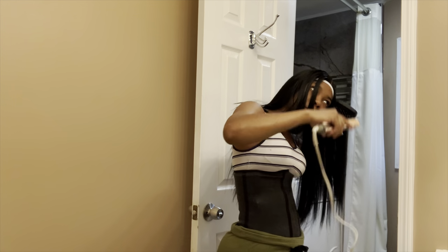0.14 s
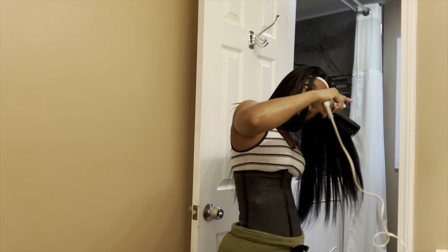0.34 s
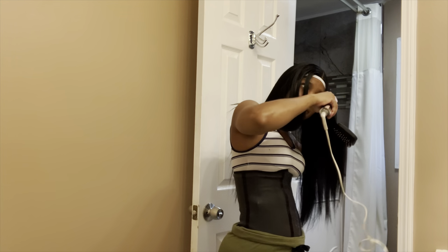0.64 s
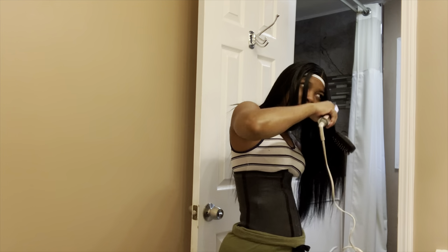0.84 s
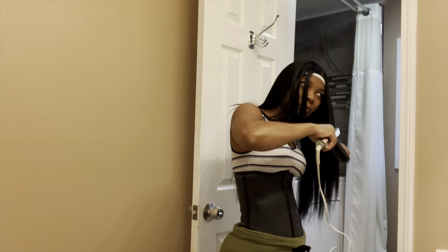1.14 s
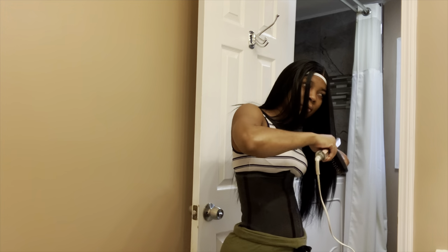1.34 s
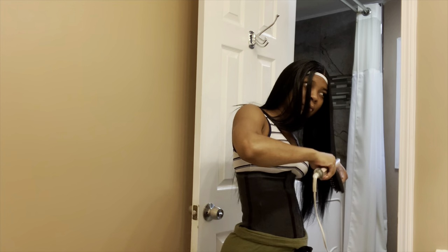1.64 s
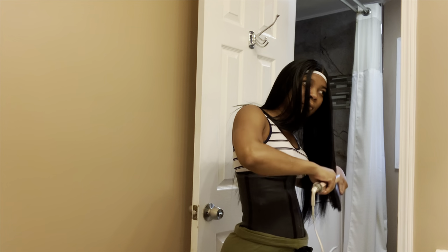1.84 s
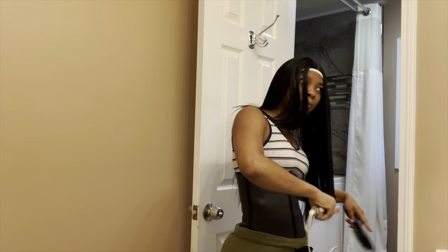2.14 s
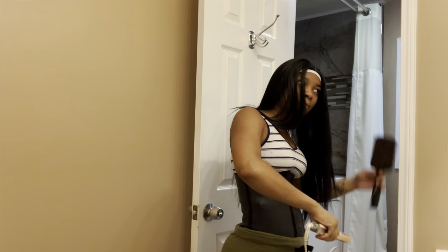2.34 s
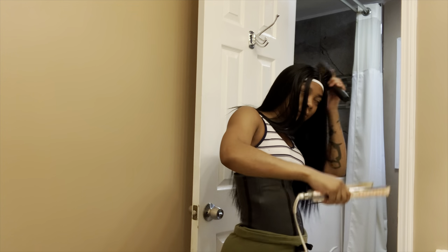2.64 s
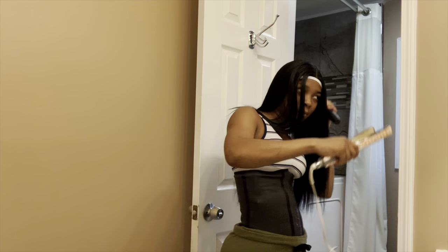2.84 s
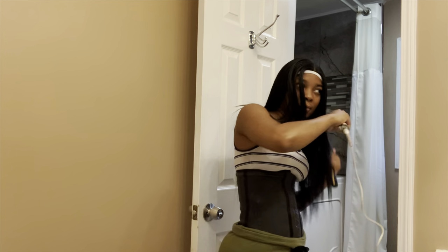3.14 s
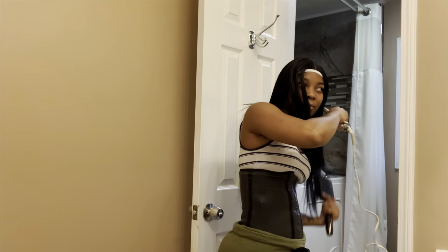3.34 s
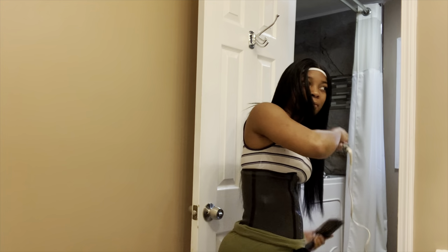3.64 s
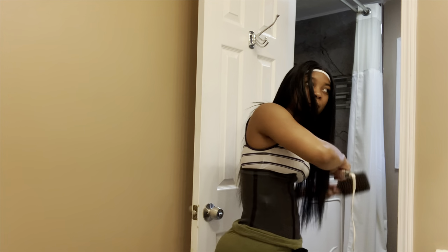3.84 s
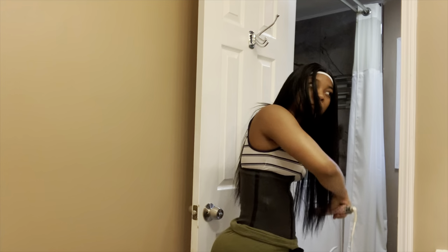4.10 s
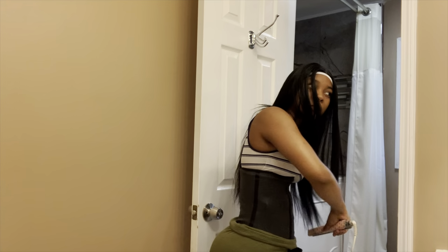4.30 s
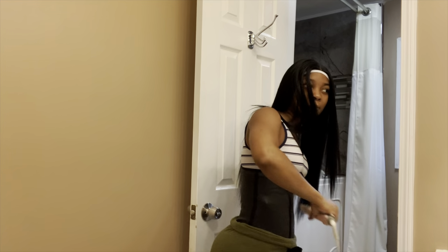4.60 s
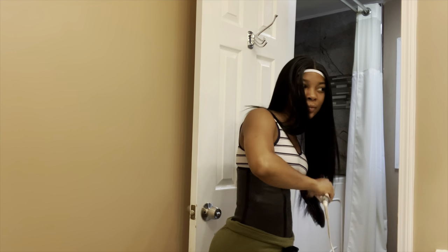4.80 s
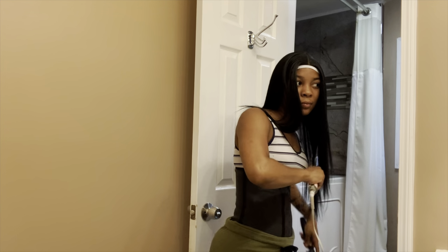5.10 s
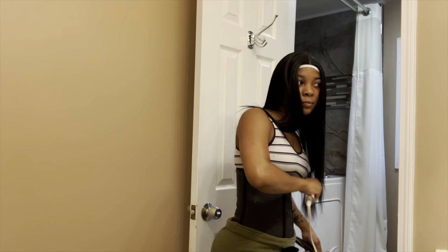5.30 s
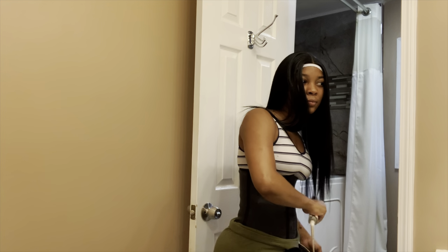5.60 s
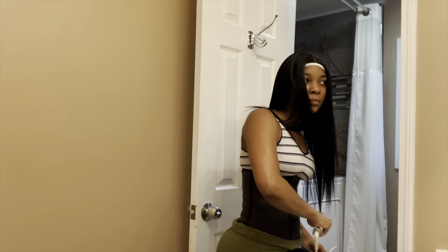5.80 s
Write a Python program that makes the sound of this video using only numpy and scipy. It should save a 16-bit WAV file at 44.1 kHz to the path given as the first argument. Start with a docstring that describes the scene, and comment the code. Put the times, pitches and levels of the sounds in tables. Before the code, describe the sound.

A brush is pulled through long synthetic hair in short scraping strokes, with plastic clacks, a flat iron clapping, footfalls and ripping tangles indoors.

```python
"""In a small, hard-walled hallway with a faint rumble, a paddle brush is drawn through long synthetic hair.
From the start, random slips of the bristles scrape, chatter and hiss, and the brush clacks in the hand.
Soon a flat iron claps and rings; then gliding fuzzy tones sing in the strands and loose ends swish.
Soft steps and dull landings of the brush follow, and a tangle rips in a burst of snaps. Later a heavy step
sets the floor ringing, something bumps the door, and a louder tangle rips before the last strokes."""
import sys
import numpy as np
from scipy import signal
from scipy.fft import rfft, irfft
from scipy.io import wavfile
from scipy.ndimage import uniform_filter1d

SR = 44100
rng = np.random.default_rng(int(sys.argv[2]) if len(sys.argv) > 2 else 0)


def bounce(signal):
    """Save signal as a 16-bit WAV file at the path given by the first command-line argument."""
    frames = np.transpose(np.atleast_2d(signal))
    limited = np.clip(frames, -1, 1)
    pcm = np.round(limited * 32767).astype(np.int16)
    wavfile.write(sys.argv[1], SR, pcm)


N = 262703

SIZE = 32768  # samples in a short sound or a filter
HZ = np.fft.rfftfreq(SIZE, 1 / SR)
T = np.arange(SIZE) / SR

# Faint rumble and hiss of the house. Each row: frequency in Hz, strength in dB per Hz.
AIR_SPECTRUM = [(20, -11), (45, 8), (80, 0), (140, -3.5), (250, -7.5), (500, -10), (1000, -20), (3000, -24),
                (8000, -29.5), (15000, -40)]
AIR_DB = -59.5

# Long passes down the hair. Each row: start in seconds, end in seconds, hiss of the strands in dB,
# its drift in dB per second, chatter at the start in dB, chatter at the end in dB, cushion drumming in dB.
PASSES = [(0.0, 0.552, -62, -22.5, -80, -109, -52.5), (0.813, 1.116, -61, -32, -56, -64, -64.5),
          (1.212, 2.243, -67.5, 2.5, -61, -56.5, -56.5), (2.667, 3.386, -65.5, 4, -48.5, -66, -50.5),
          (3.583, 4.318, -61, -1.5, -52, -46, -62), (5.192, 5.593, -58.5, -40, -46, -56, -68),
          (5.567, 5.963, -72, 25, -50.5, -46.5, -68)]
PASS_ATTACK_S, PASS_RELEASE_DB_PER_S = 0.027, 234
CUSHION_FADE_DB_PER_S = 11  # the cushion drums less as the brush leaves the head
# The brush pressed against the cap. Each row: start in seconds, length in seconds, level in dB,
# chatter of the bristles relative to it in dB.
PRESSES = [(-.02, 0.066, -41, -3), (0.128, 0.088, -49, -5), (0.512, 0.039, -51.5, -1),
           (0.826, 0.097, -52.5, -36), (1.274, 0.075, -51.5, 0), (1.6, .15, -53, -4.5),
           (1.753, 0.077, -48.5, -4), (2.183, 0.2, -60.5, -26), (2.442, 0.032, -46.5, 5),
           (2.7, 0.11, -42, -7.5), (2.756, 0.058, -38, -1), (2.831, 0.067, -34, -8.5),
           (2.931, 0.045, -50, -4), (3.186, 0.21, -51.5, -5), (3.792, 0.054, -51, -7),
           (4.205, 0.13, -44.5, -4), (4.39, 0.11, -46.5, -15), (4.492, 0.04, -52, 0),
           (4.617, 0.077, -41.5, 7), (4.822, 0.15, -55.5, -40), (5.76, 0.03, -56, -2)]
PRESS_ATTACK_S, PRESS_RELEASE_DB_PER_S, CHATTER_RELEASE_DB_PER_S = 0.023, 133, 198
PRESS_HISS_DB = -25.5  # hiss relative to the chatter while pressing
# The brush speeds up through loose ends. Each row: moment of top speed in seconds, rise in seconds,
# fall in seconds, chatter in dB, hiss in dB.
SWISHES = [(2.125, 0.17, 0.19, -39, -55.5), (2.245, 0.17, 0.11, -62, -51.5), (2.46, 0.033, 0.073, -58, -51),
           (3.7, 0.086, 0.21, -50.5, -55), (4.25, 0.15, 0.26, -38.5, -52.5),
           (5.795, 0.13, 0.095, -44, -59.5), (5.945, 0.049, 0.047, -53, -52)]
SWISH_FALL_DB = 39  # how steeply a swish drops away on both sides of its top speed
# Colours of four kinds of friction. Each row: frequency in Hz, strength in dB per Hz.
SCRAPE_SPECTRUM = [(40, -9), (80, -5.5), (110, -5), (190, -0.5), (290, -1.5), (480, 2.5), (700, 1),
                   (900, -5.5), (1200, -22.5), (2000, -39), (5000, -63)]
RASP_SPECTRUM = [(300, -10.5), (650, -8), (850, -5.5), (1100, -5.5), (1500, -7.5), (2500, -21.5),
                 (4000, -25), (9000, -63)]
CHATTER_SPECTRUM = [(400, -33), (900, -3), (1300, -7), (1650, -1.5), (2000, 3.5), (2600, -1.5), (3200, -2),
                    (4100, -11), (6000, -14.5), (12000, -40)]
HISS_SPECTRUM = [(1500, -6.5), (3200, 4.5), (5000, 1), (6500, 0), (8500, 3), (10500, 1.5), (14000, -5.5),
                 (16000, -9)]

# Clacks of the brush. Each row: start in seconds, level in dB, tilt in dB per octave,
# lift of the hand's low thud in dB, favoured ring in Hz, lift of that ring in dB.
BRUSH_CLACKS = [(.06, -36, -3.5, -30, 704, 1), (1.765, -49.5, -3, -12, 600, 1),
                (1.829, -51.5, -4.5, -12, 560, -3), (1.246, -47.5, 19.5, -9, 6750, 14),
                (2.423, -48.5, 5.5, -16, 2050, 3), (2.441, -43.5, -3.5, -15, 620, 7),
                (2.457, -41, -0.5, -11, 2580, 2), (2.492, -35, -2.5, -4.5, 1250, 2.5),
                (2.573, -49.5, -9.5, -22, 690, 0), (2.822, -34, -5.5, -18, 600, -2),
                (3.05, -44, -3.5, -22, 790, 3), (3.209, -50, 1.5, 18, 1710, 7),
                (3.359, -48.5, 4.5, -4, 1650, 11), (3.735, -30, -2.5, -4, 860, 0),
                (3.745, -32.5, -4, 3.5, 500, 8), (3.819, -42.5, -6.5, -4, 905, 7),
                (3.885, -46.5, -4, 0, 600, -6), (4.466, -39.5, -4, 0, 723, 12),
                (4.488, -38.5, -2, -6, 690, 8.5), (4.517, -40, -2, 2, 790, 6),
                (4.571, -33.5, -5.5, -10.5, 1570, 12), (4.656, -28.5, -0.5, 2, 880, 7.5),
                (4.678, -37.5, 6.5, 3, 910, 7), (4.7, -39.5, 0, -6, 870, 5)]
# Rings of the brush. Each row: frequency in Hz, gain in dB, time to fall by 60 dB in seconds.
BRUSH_MODES = [(480, -10, 0.038), (760, -13, 0.069), (1036, 3, 0.052), (2410, 2, 0.24)]
# Colour of struck plastic. Each row: frequency in Hz, strength in dB per Hz.
PLASTIC_SPECTRUM = [(40, -51), (120, -2.5), (230, -13.5), (330, -6), (500, -5), (780, 3.5), (1020, -3.5),
                    (1400, -5), (2200, -5.5), (3100, -6.5), (4500, -15.5), (7000, -23), (10000, -28.5),
                    (15000, -40.5)]
# The flat iron claps shut and its hinge snaps. Each row: start in seconds, level in dB, tilt in dB
# per octave, lift of the hand's low thud in dB, favoured ring in Hz, lift of that ring in dB.
IRON_CLACKS = [(0.7125, -28, 0, 7.5, 750, 2.2), (0.723, -30.5, -1, 10.5, 1230, 13),
               (0.735, -35, 0.5, 12, 1320, 5.7), (1.113, -29, -2, -30, 825, 3.9),
               (1.126, -32, -2, 0, 846, 5.4), (1.1575, -28.5, 3, -12, 1785, 10.6),
               (1.1665, -28, -2, -4, 2320, 9), (1.1795, -36, -2.5, -9, 790, 2.2),
               (1.217, -35.5, -4.5, -22, 700, 3)]
# Rings of the iron. Each row: frequency in Hz, gain in dB, time to fall by 60 dB in seconds.
IRON_MODES = [(558, 5, 0.27), (710, -24, 0.21), (810, -2, 0.11), (1340, 3, 0.094), (1387, -5, 0.089),
              (1560, -6, 0.025), (1785, 2, 0.44), (2030, -2, 0.17), (2450, -8, 0.28), (2830, -3, 0.035),
              (3212, 5, 0.076), (3467, 4, 0.12), (3880, 4, 0.16)]
IRON_DIRECT_DB = 3  # held out towards the microphones: direct sound over the reflections

# Strands singing between the bristles. Each row: start in seconds, end in seconds, start pitch in Hz,
# end pitch in Hz, level in dB ahead of the echoes.
ZIPS = [(1.723, 2.118, 1720, 2025, -57.5), (2.039, 2.24, 2050, 2330, -58), (3.951, 4.189, 1873, 1950, -65),
        (5.242, 5.473, 2990, 3270, -61), (5.554, 5.686, 2570, 2280, -61), (5.676, 5.908, 1990, 1994, -57),
        (5.711, 5.96, 2120, 2345, -56.5)]
ZIP_WAVER = 0.0195  # share by which the uneven pull bends the pitch

# Heel and sole on the floor. Each row: start in seconds, level in dB, contact time in seconds,
# time the sole takes to roll down in seconds.
STEPS = [(2.69, -43, 0.02, 0.045), (2.775, -42.5, 0.012, 0.045), (4.284, -22.5, 0.0037, 0.046),
         (4.3135, -28.5, 0.0025, 0.021), (4.343, -29, 0.0035, 0.041), (4.397, -33, 0.033, 0.04),
         (4.443, -34, 0.017, 0.027), (4.49, -43, 0.011, 0.03), (4.64, -37, 0.0085, 0.014),
         (5.585, -54, 0.017, 0.09)]
# Rings of the floor. Each row: frequency in Hz, strength in dB, time to fall by 60 dB in seconds.
FLOOR_MODES = [(42.7, -6, 0.4), (99.8, 6.5, 0.34), (124, 7, 0.22), (151.3, 10.5, 0.17), (196, 2.5, 0.15),
               (286, 2.5, 0.21), (320, 4, 0.2), (364.3, 7, 0.29), (453, 10, 0.12), (600, 7, 0.14)]

# The brush lands on the head. Each row: start in seconds, level in dB, boom in Hz.
THUDS = [(2.699, -45.5, 474), (2.766, -33, 447), (2.796, -34.5, 500), (2.867, -45, 590), (2.913, -47, 590),
         (2.955, -47, 493), (3.208, -49, 480), (3.267, -39, 204), (3.357, -36.5, 590), (3.375, -52, 180)]
# Colour of the padded brush. Each row: frequency in Hz, strength in dB per Hz.
PAD_SPECTRUM = [(50, -17), (110, -1), (180, 3), (320, -0.5), (500, -0.5), (650, 1.5), (900, -17.5),
                (1500, -20), (4000, -47)]
THUD_LIFT_DB = 8.5  # lift of the boom

# Tangles giving way. Each row: start in seconds, level in dB, length in seconds, ring of the strands
# in Hz, its lift in dB, tilt in dB per octave.
RIPS = [(3.463, -32, 0.018, 5670, 7.5, -0.2), (5.037, -21, 0.013, 2180, 5, 1.5)]
# Colour of a rip. Each row: frequency in Hz, strength in dB per Hz.
RIP_SPECTRUM = [(50, 5), (130, -2), (200, -6.5), (330, 9), (480, 6), (700, 7.5), (1100, 6), (1600, 0.5),
                (3000, 0.5), (4400, 0), (5800, 1), (8500, -3), (11000, -3), (14500, -17)]
RIP_ATTACK_S = .002  # the break spreads through the tangle
# Rings as the bristles snap free. Each row: frequency in Hz, gain in dB, time to fall by 60 dB in seconds.
BRISTLE_MODES = [(341, -1.5, 0.16), (733, -5, 0.14), (1040, 4.5, 0.16), (1260, 3, 0.18), (2082, -2, 0.22),
                 (2250, -0.5, 0.1), (2544, 4, .2), (3480, 1, 0.24), (5660, -1, 0.2), (5930, 6, 0.11),
                 (8116, 6, 0.22)]

# Bumps on the door. Each row: start in seconds, level in dB, contact time in seconds,
# time it rubs on in seconds.
BUMPS = [(4.653, -19.5, 0.0003, 0.012), (4.68, -30, 0.00023, 0.01), (4.697, -26.5, 0.00064, 0.0065),
         (4.727, -39, 0.0005, 0.007), (4.765, -41, 0.00023, 0.017)]
# Rings of the door. Each row: frequency in Hz, strength in dB, time to fall by 60 dB in seconds.
DOOR_MODES = [(439, 3, 0.087), (480, 7.5, 0.1), (544, 9, 0.11), (590, 8, 0.082), (686, -2, 0.1),
              (790, 4, 0.06), (866, 1, 0.13), (1037, 11.5, 0.13), (1092, 1.5, 0.17), (1110, -8, .1),
              (1306, -6, 0.14)]

# How long the hallway's reflections last. Each row: frequency in Hz, time to fall by 60 dB in seconds.
ROOM_T60 = [(60, 0.28), (230, 0.37), (450, 0.28), (1000, 0.29), (2500, 0.27), (6000, 0.27), (14000, 0.2)]
# First echoes off the walls. Each row: delay in seconds, level in dB.
WALLS = [(.0021, -8.5), (.0047, -10), (.0088, -9.5), (0.0122, -7), (0.016, -14.5), (0.025, -9)]
# Standing waves. Each row: frequency in Hz, gain in dB, time to fall by 60 dB in seconds.
STANDING_WAVES = [(109, 2, 0.15), (165.8, 0.5, 0.74), (450, 2, 0.35), (483.8, 2, 0.27), (530, -34, 0.83),
                  (596, -22, 0.82), (700.7, -3, 0.081)]
# How alike the two microphones hear. Each row: frequency in Hz, left-right correlation (no unit).
LIKENESS = [(40, .94), (250, .95), (500, .45), (950, -.45), (1800, .15), (3500, .05), (6700, .05),
            (7300, -.85), (7900, .05), (14000, .05)]
LEFT_LAG = 21  # samples by which the direct sound reaches the right microphone first
# Lean to the left. Each row: frequency in Hz, left minus right in dB.
LEFT_DB = [(30, 11), (120, 5), (250, 7.5), (500, 2), (2000, 1), (8000, 3.5), (12000, 0)]
# Response of the microphones, with the hallway's bass null where they stand.
# Each row: frequency in Hz, gain in dB.
MICROPHONE = [(18, -16), (28, -8), (38, -2), (62, -0.5), (78, -8), (92, -2.5), (5800, 0), (6800, -2),
              (7400, -10.5), (7800, -0.5), (8400, 3), (9800, -1), (14300, 6), (15200, -19)]
EDGE_HZ = 15500  # little passes above this


def amp(db):
    """Turns decibels into a gain."""
    return 10 ** (np.asarray(db) / 20)


def unit(x):
    """Scales to an rms (average strength) of 1."""
    return x / np.sqrt(np.mean(x ** 2) + 1e-20)


def read(points, hz):
    """Reads a table between its rows, on a logarithmic frequency axis."""
    f, value = np.transpose(points)
    return np.interp(np.log(hz + 1), np.log(f + 1), value)


def hump(hz, octaves):
    """A bell of height 1 around one frequency."""
    return np.exp(-.5 * (np.log2((HZ + 1) / hz) / octaves) ** 2)


def colour(x, db):
    """Filters with the given gain at each of HZ, without sounding ahead of time."""
    log_gain = np.fft.irfft(np.log(amp(db)))
    # folding the second half onto the first makes the filter start at once (minimum phase)
    log_gain[1:SIZE // 2] *= 2
    log_gain[SIZE // 2 + 1:] = 0
    taps = irfft(np.exp(rfft(log_gain)))[:SIZE // 8]
    return signal.fftconvolve(np.atleast_2d(x), taps[None], axes=1)[:, :x.shape[-1]]


def resonate(x, modes):
    """Adds the ringing of a set of modes, each with the given gain at its own frequency."""
    ring = np.zeros(SIZE)
    for hz, db, t60 in modes:
        scale = 2 * np.log(1000) / (t60 * SR)
        ring += scale * amp(db - 60 * T / t60) * np.cos(2 * np.pi * hz * T)
    return x + signal.fftconvolve(x, ring[None], axes=1)[:, :x.shape[1]]


def add(mix, s, db, sound, size=441):
    """Lays a sound into the mix with its loudest hundredth of a second at the given level."""
    peak = np.sqrt(uniform_filter1d((sound ** 2).mean(0), size).max())
    part = mix[:, round(s * SR):][:, :sound.shape[1]]
    part += amp(db) / peak * sound[:, :part.shape[1]]


def pair(x):
    """Blends two unrelated signals into what two close microphones pick up: alike in the bass."""
    a, b = rfft(x)
    same = np.clip(read(LIKENESS, np.fft.rfftfreq(x.shape[1], 1 / SR)), -.99, .99)
    mid = a * np.sqrt((1 + same) / 2)
    side = b * np.sqrt((1 - same) / 2)
    return irfft(np.array([mid + side, mid - side]), x.shape[1])


def hallway(x, direct_db=-7):
    """The direct sound, echoes off the near walls, then thickening reflections of noise fading by pitch."""
    taps = rng.standard_normal((2, SIZE)) * (rng.random(SIZE) < .12 + 8 * T)
    hz, t, z = signal.stft(pair(taps), SR, nperseg=256)
    fade = amp(-60 * t / read(ROOM_T60, hz)[:, None])
    tail = signal.istft(z * fade, SR, nperseg=256)[1]
    tail /= np.linalg.norm(tail[0])
    tail[[0, 1], [LEFT_LAG, 0]] += amp(direct_db)
    for delay, db in WALLS:
        lags = rng.integers(0, LEFT_LAG, 2)  # each echo from its own direction
        tail[[0, 1], round(delay * SR) + lags] += amp(db)
    return signal.fftconvolve(np.atleast_2d(x), tail, axes=1)[:, :x.shape[-1]]


def slips(size, per_s, spread_db):
    """Random stick-slip clicks; a positive spread gives a few large ones, a negative one a few small."""
    heights = amp(spread_db * np.minimum(rng.exponential(1, size), 4))
    happens = rng.random(size) < per_s / SR
    return unit(heights * rng.standard_normal(size) * happens)


def air():
    """Steady noise, strongest in the bass: faint rumble and hiss of the house."""
    noise = pair(rng.standard_normal((2, N)))
    return amp(AIR_DB) * unit(colour(noise, read(AIR_SPECTRUM, HZ)))


def held(start, length, attack_s, release_db_per_s):
    """Loudness curve of a gesture: rises, holds, then dies away."""
    t = np.arange(N) / SR - start
    return np.clip(t / attack_s, 0, 1) * amp(-release_db_per_s * np.maximum(t - length, 0))


def gestures():
    """Passes, presses and swishes add their power to the scrape, the chatter and the hiss."""
    t, power = np.arange(N) / SR, np.zeros((3, N))
    for start, end, hiss_db, drift_db_per_s, first_db, last_db, cushion_db in PASSES:
        contact = held(start, end - start, PASS_ATTACK_S, PASS_RELEASE_DB_PER_S)
        age = np.clip(t, start, end) - start
        scrape = contact * amp(cushion_db - CUSHION_FADE_DB_PER_S * age)
        chatter = contact * amp(np.interp(t, [start, end], [first_db, last_db]))
        hiss = contact * amp(hiss_db + drift_db_per_s * age)
        power += np.square([scrape, chatter, hiss])
    for start, length, db, chatter_db in PRESSES:
        scrape = amp(db) * held(start, length, PRESS_ATTACK_S, PRESS_RELEASE_DB_PER_S)
        chatter = amp(db + chatter_db) * held(start, length, PRESS_ATTACK_S, CHATTER_RELEASE_DB_PER_S)
        power += np.square([scrape, chatter, chatter * amp(PRESS_HISS_DB)])
    for s, rise, fall, chatter_db, hiss_db in SWISHES:
        away = np.minimum(np.maximum((s - t) / rise, (t - s) / fall), 10)
        speed_gain = amp(-SWISH_FALL_DB * (np.hypot(away, .5) - .5))  # rounded at the top
        power[1:] += (amp([[chatter_db], [hiss_db]]) * speed_gain) ** 2
    return np.sqrt(power)


def friction(spectrum, per_s, spread_db, clump_db=3, size=700):
    """A stream of slips that come in clumps as rows of bristles catch, coloured by what they shake."""
    clumps = amp(clump_db * unit(uniform_filter1d(rng.standard_normal(N), size)))
    stream = hallway(clumps * slips(N, per_s, spread_db), direct_db=-7.5)
    return unit(colour(stream, read(spectrum, HZ)))


def brushing():
    """The cushion drums on the cap, bristles chatter and strands hiss; hard pressure adds a rasp."""
    scrape_db, chatter_db, hiss_db = 20 * np.log10(gestures() + 1e-9)
    rasp_db = (scrape_db + chatter_db) / 2  # follows the scrape and the chatter together
    # the small numbers trim the balance of the four kinds
    scrape = amp(scrape_db - 0.1) * friction(SCRAPE_SPECTRUM, per_s=1300, spread_db=0.5, clump_db=1.0)
    rasp = amp(rasp_db - 6.5) * friction(RASP_SPECTRUM, per_s=220, spread_db=2.5)
    chatter = amp(chatter_db - 6.5) * friction(CHATTER_SPECTRUM, per_s=1300, spread_db=1.4, clump_db=2.5)
    hiss = amp(hiss_db + 1.0) * friction(HISS_SPECTRUM, per_s=6000, spread_db=-1.5)
    return scrape + rasp + chatter + hiss


def clacks(rows, modes, spread_s, direct_db, rattle_s, rattle_hz):
    """A sharp contact rings plastic and rattles its loose parts; the place struck favours one ring."""
    out = np.zeros((2, N))
    # bending waves carry the treble first, so the click spreads a little: spread_s is the delay at 1 kHz
    click = np.exp(-4j * np.pi * spread_s * np.sqrt(HZ * 10 ** 3))
    for s, db, tilt_db, thud_db, ring_hz, ring_db in rows:
        rattle = rfft(np.exp(-T / rattle_s) * rng.standard_normal(SIZE))
        rattle /= np.linalg.norm(irfft(rattle))
        # the rattle takes over from the click above rattle_hz
        blow = irfft((rattle_hz * click + HZ * rattle) / np.hypot(HZ, rattle_hz))
        body = read(PLASTIC_SPECTRUM, HZ) + tilt_db * np.log2(np.maximum(HZ, 300) / 1000)
        body += thud_db * hump(112, octaves=1.0) + ring_db * hump(ring_hz, octaves=0.19)
        ringing = hallway(resonate(blow[None], modes), direct_db)
        add(out, s, db, colour(ringing, body))
    return out


def brush_clacks():
    """The brush knocks in the hand: clicks ring its few modes."""
    return clacks(BRUSH_CLACKS, BRUSH_MODES, spread_s=0.001804, direct_db=-2.0,
                  rattle_s=0.021, rattle_hz=4120)


def iron_clacks():
    """The flat iron claps shut and its hinge snaps: clicks ring its many modes."""
    return clacks(IRON_CLACKS, IRON_MODES, spread_s=0.00159, direct_db=IRON_DIRECT_DB,
                  rattle_s=0.028, rattle_hz=3470)


def zips(width_hz=120):
    """Strands sing through the bristles: a fuzzy tone that glides with the speed of the brush."""
    dry = np.zeros((1, N))
    r = np.exp(-np.pi * width_hz / SR)  # two equal smoothing stages, each width_hz wide
    for start, end, start_hz, end_hz, db in ZIPS:
        size = round((end - start) * SR)
        noise = rng.standard_normal(size) + 1j * rng.standard_normal(size)
        flutter = signal.lfilter([1], np.poly([r, r]), noise)
        pull = 1 + ZIP_WAVER * unit(uniform_filter1d(rng.standard_normal(size), size=2500))
        pitch_hz = pull * np.linspace(start_hz, end_hz, size)
        turn = np.exp(2j * np.pi * np.cumsum(pitch_hz) / SR)
        tone = (flutter * turn).real * signal.windows.tukey(size, .5)
        add(dry, start, db, tone[None])
    return hallway(dry)


def blows(rows, modes, rub, wet_db, detune, place_db):
    """A soft push and a short rub set a panel ringing; the longer the contact, the duller the sound."""
    out = np.zeros((2, N))
    for s, db, contact, rub_s in rows:
        # each blow lands elsewhere and loads the panel: its modes shift in strength and pitch
        place, load = rng.standard_normal((2, len(modes)))
        ring = np.zeros(SIZE)
        for k, (hz, gain_db, t60) in enumerate(modes):
            sign = (-1) ** k  # neighbours swing in opposite directions: the ring builds over a few cycles
            fade = amp(gain_db + place_db * place[k] - 60 * T / t60)
            ring += sign * fade * np.sin(2 * np.pi * hz * (1 + detune * load[k]) * T)
        force = (T == 0) + rub * np.exp(-T / rub_s) * unit(rng.standard_normal(SIZE))
        push = signal.fftconvolve(force, T * np.exp(-2 * np.pi * T / contact))[:SIZE]
        sound = signal.fftconvolve(push, ring)[:SIZE]
        direct = np.array([np.pad(sound, (LEFT_LAG, 0))[:SIZE], sound])
        add(out, s, db, direct + amp(wet_db) * hallway(sound, direct_db=-31))
    return out


def footsteps():
    """Heel and sole push on the floor and set its low modes ringing."""
    return blows(STEPS, FLOOR_MODES, rub=0.016, wet_db=-12.5, detune=0.0055, place_db=2.0)


def thuds(settle_db=-27, settle_s=0.011):
    """The padded brush lands on the head: one dull blow, then the bristles settle."""
    out = np.zeros((2, N))
    for s, db, hz in THUDS:
        settling = np.exp(-T / settle_s) * slips(SIZE, per_s=2000, spread_db=4.0)
        blow = (T == 0) + amp(settle_db) * settling
        body = read(PAD_SPECTRUM, HZ) + THUD_LIFT_DB * hump(hz, octaves=0.092)
        add(out, s, db, colour(hallway(blow, direct_db=-0.5), body))
    return out


def rips(strain_db=-22, strain_s=0.0048, count=4):
    """A tangle creaks taut; the break spreads and bristles snap free within a few hundredths of a second."""
    out = np.zeros((2, N))
    lead_s = 1 / 20  # room for the creak ahead of the break
    t = T - lead_s
    for s, db, length, ring_hz, ring_db, tilt_db in RIPS:
        strain = amp(strain_db) * np.exp(-abs(t) / strain_s)
        release = (1 - np.exp(-np.maximum(t, 0) / RIP_ATTACK_S)) * np.exp(-(t / length) ** 2)
        snaps = np.zeros((2, SIZE))
        for _ in range(count):
            # each group of bristles snaps at its own place and so reaches the walls by its own paths
            group = (strain + release) * slips(SIZE, per_s=20000, spread_db=1.0)
            snaps += hallway(group, direct_db=-11.0)
        strands = read(RIP_SPECTRUM, HZ) + ring_db * hump(ring_hz, octaves=0.5)
        strands += tilt_db * np.log2((HZ + 100) / 1000)
        add(out, s - lead_s, db, colour(resonate(snaps, BRISTLE_MODES), strands))
    return out


def door_bumps():
    """Something bumps the door: quick pushes set the panel's modes ringing."""
    return blows(BUMPS, DOOR_MODES, rub=0.017, wet_db=-8.5, detune=0.012, place_db=2.5)


def scene():
    """All the sources together; the nearer ones stir the hallway's standing waves."""
    hair = brushing() + zips() + rips()
    brush = brush_clacks() + thuds()
    near = resonate(hair + brush + iron_clacks(), STANDING_WAVES)
    return near + footsteps() + door_bumps() + air()


def record(dry):
    """A microphone pair, stronger on the left and notched in the treble; then the band limit."""
    lean_db = read(LEFT_DB, np.fft.rfftfreq(N, 1 / SR)) / 2
    leaning = irfft(rfft(dry) * amp([lean_db, -lean_db]), N)
    heard = colour(leaning, read(MICROPHONE, HZ))
    low_pass = signal.firwin(255, EDGE_HZ, window=("kaiser", 9), fs=SR)
    return signal.oaconvolve(heard, low_pass[None], "same")


dry = scene()
out = record(dry)
bounce(out)
```